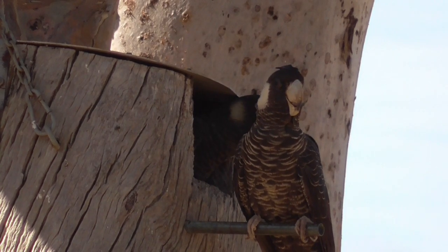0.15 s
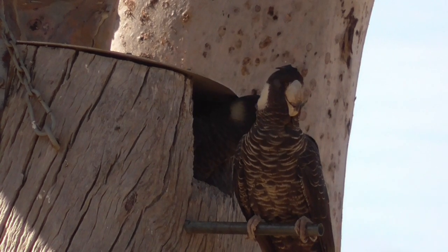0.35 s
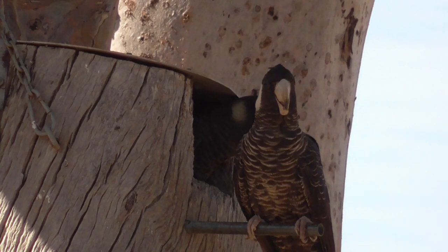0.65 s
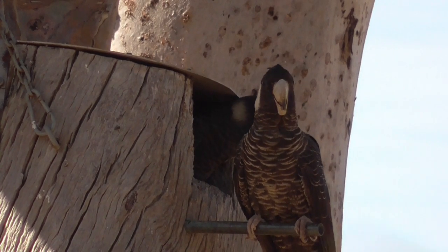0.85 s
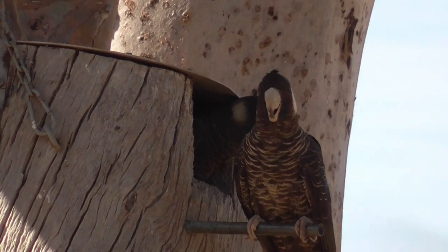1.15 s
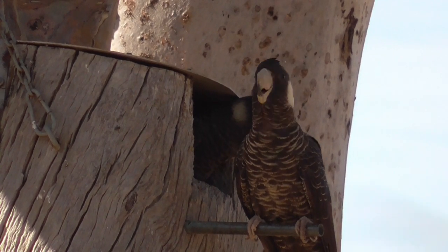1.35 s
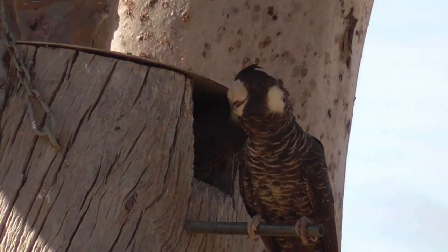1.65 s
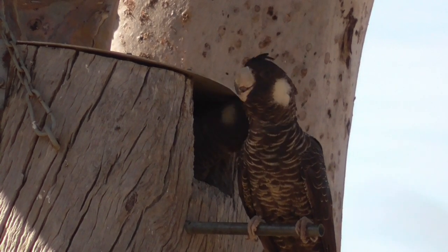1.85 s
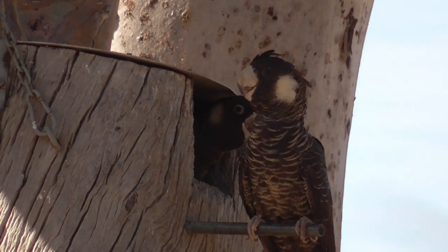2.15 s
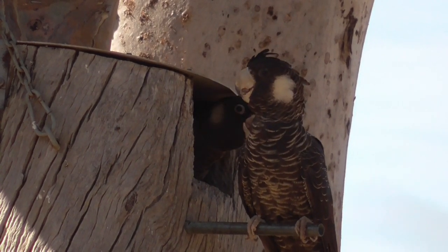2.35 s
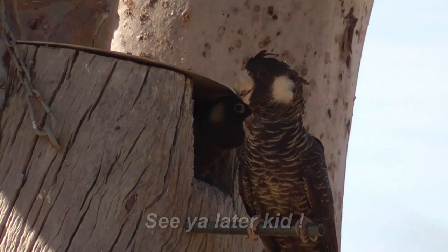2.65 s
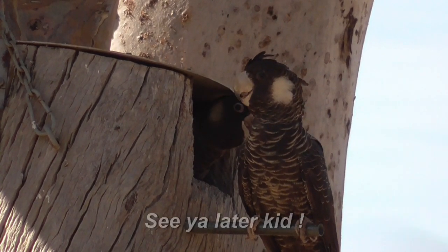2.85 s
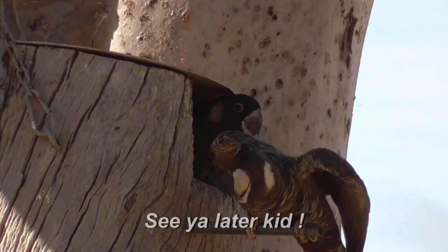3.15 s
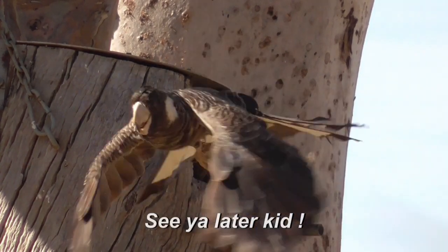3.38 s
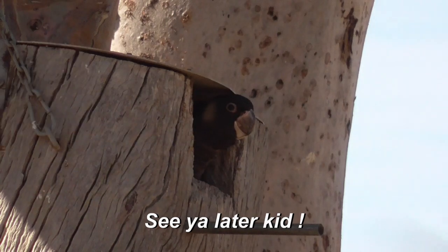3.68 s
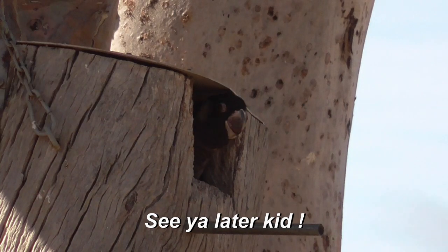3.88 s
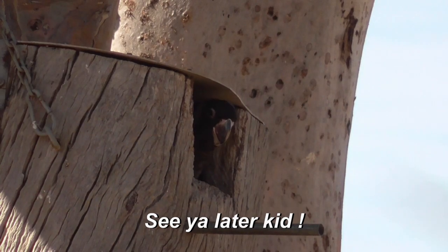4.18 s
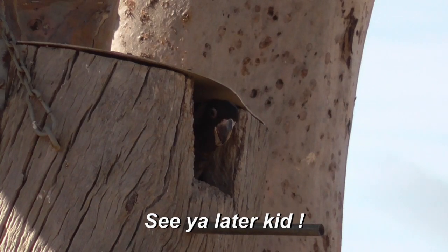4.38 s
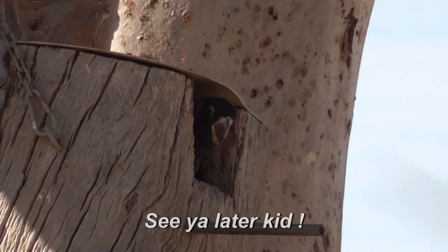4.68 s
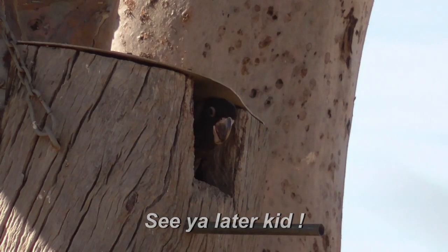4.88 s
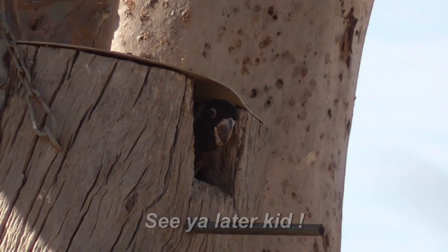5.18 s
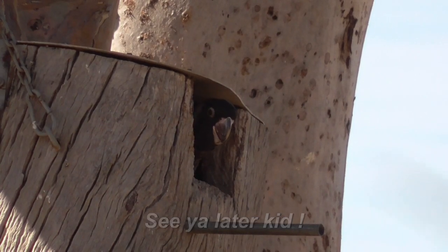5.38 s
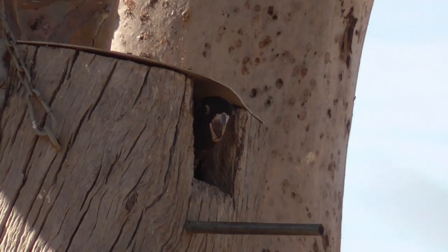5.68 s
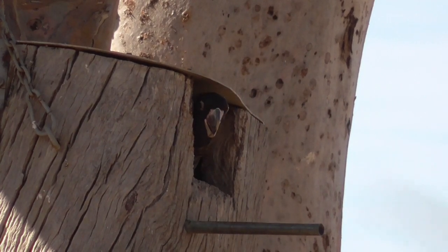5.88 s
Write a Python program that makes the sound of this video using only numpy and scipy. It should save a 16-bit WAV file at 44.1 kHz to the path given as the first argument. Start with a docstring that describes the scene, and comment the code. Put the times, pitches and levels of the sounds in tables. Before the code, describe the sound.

Quiet outdoor air with far hoarse parrot calls and a faint accelerating engine, until a nearby cockatoo bursts into piercing, yodelling whistles split by a croak.

```python
"""From the start a distant road vehicle gathers speed under open-air noise; far cockatoos chatter softly from 0.5 s.
Brief treble rustles fall at 1 s and 3 s. At 4.5 s a cockatoo close by yodels a whistle that breaks between registers,
croaks at 5.0 s and whistles again at 5.2 s, as the vehicle pulls again after a gear change; trees send back echoes.
Voices and engine are harmonic oscillators, the croak a pulsed resonance, breath, rustles and air coloured noise."""
import sys
import numpy as np
from scipy import signal
from scipy.fft import rfft, irfft, next_fast_len
from scipy.io import wavfile
from scipy.ndimage import uniform_filter1d

SR = 44100
rng = np.random.default_rng(int(sys.argv[2]) if len(sys.argv) > 2 else 0)


def to_wav(sig):
    """Store sig (one row per channel, or 1-D mono) as 16-bit WAV at the path in sys.argv[1].

    Samples outside -1..1 are clipped; the rate is SR.
    """
    pcm = np.clip(np.atleast_2d(sig), -1, 1) * 32767
    pcm = np.round(pcm).astype(np.int16)
    wavfile.write(sys.argv[1], SR, pcm.T)  # frames by channels


N = 265923


def from_db(db):
    """Gain of a level in dB."""
    return 10 ** (np.asarray(db) / 20)


def rms_one(x):
    """Scaled to rms 1."""
    return x / np.sqrt(np.mean(x ** 2) + 1e-20)


def at_hz(points, hz):
    """A spectrum table read on a log-frequency axis."""
    table_hz, values = np.array(points).T
    return np.interp(np.log(hz), np.log(table_hz), values)


def in_time(rows):
    """Each column as a curve over all samples."""
    time_s, *columns = np.transpose(rows)
    return [np.interp(np.arange(N) / SR, time_s, column) for column in columns]


def window(start_s, length_s, edge_s):
    """Span with soft edges centred on its ends; spans shorter than edge_s peak below 1."""
    t = np.arange(N) / SR - start_s
    return np.clip(np.minimum(t, length_s - t) / edge_s + .5, 0, 1)


def sounding(tables, edge_s):
    """1 while any note sounds."""
    gates = [window(note[0][0], note[-1][0] - note[0][0], edge_s) for note in tables]
    return np.minimum(sum(gates), 1)


def noise_band(low_hz, high_hz, order, shape):
    """White noise through a band-pass."""
    sos = signal.butter(order, [low_hz, high_hz], "band", fs=SR, output="sos")
    return signal.sosfilt(sos, rng.standard_normal(shape))


def wobble(rate_hz):
    """Low-passed noise of rms 1."""
    sos = signal.butter(4, min(rate_hz, 9000), fs=SR, output="sos")
    return rms_one(signal.sosfilt(sos, rng.standard_normal(N)))


# stereo noise likeness: hz, left_right_likeness
NOISE_LIKENESS = [(60, 0.89), (180, 0.81), (550, 0.66), (1650, 0.3), (4970, 0.29), (15000, 0.09)]
# stereo noise tilt: hz, left_minus_right_db
NOISE_BALANCE = [(60, 0.5), (180, -2), (550, -2), (1650, 0.0), (4970, -0.5), (15000, -2.5)]


def banded_noise(spectrum, patchy_db):
    """Coloured stereo noise, less alike left and right in the treble, slowly swelling; rms 1."""
    size = next_fast_len(N)
    hz = np.maximum(np.fft.rfftfreq(size, 1 / SR), 1)
    alike = np.clip(at_hz(NOISE_LIKENESS, hz), 0, 1)
    mid, side = rfft(rng.standard_normal((2, size))) * from_db(at_hz(spectrum, hz))
    both = np.sqrt(1 + alike) * mid + np.sqrt(1 - alike) * side * [[1], [-1]]
    both = both * from_db(np.outer([.5, -.5], at_hz(NOISE_BALANCE, hz)))
    swelling = from_db(patchy_db * wobble(2.18))
    return rms_one(irfft(both, size)[:, :N] * swelling)


def stack(hz, levels_db, rough, jitter):
    """Harmonics of a slightly unsteady pitch."""
    phase = 2 * np.pi * np.cumsum(hz * (1 + jitter * wobble(119))) / SR
    gains = uniform_filter1d(from_db(levels_db), size=150)  # strength cannot jump within 3 ms
    tone = sum(gain * np.sin(k * phase) for k, gain in enumerate(gains, 1))
    return np.sqrt(2) * tone * (1 + rough * wobble(150)), phase, hz


def partials(tables, colours, rough, jitter, effort):
    """One harmonic stack through all notes; colour tables and brightness set each partial's level."""
    hz, db, *bright = in_time(np.concatenate(tables))
    tilt_db = sum(bright) + effort * (db - db.max())  # a louder call is richer on top
    levels_db = [db + at_hz(colour, hz * (k + 1)) + k * tilt_db for k, colour in enumerate(colours)]
    return stack(hz, levels_db, rough, jitter)


def held(tables):
    """A note is held until the next when the voice jumps straight from one to the other."""
    out = [list(note) for note in tables]
    for note, after in zip(out, out[1:]):
        if after[0][0] - note[-1][0] < .009:
            note.append((after[0][0] - 1 / SR, *note[-1][1:]))
    return out


# near whistles, one list per register note: time_s, pitch_hz, level_db, brightness_db_per_partial
NEAR_NOTES = [
    [(4.517, 1264, -46, 1), (4.533, 1630, -41, 3), (4.542, 1757, -47, 4)],
    [(4.545, 3257, -50, 1), (4.553, 3329, -37.5, 7.5), (4.565, 3300, -64, 1.5), (4.572, 3332, -36, -3)],
    [(4.597, 3409, -36.5, -24), (4.615, 3613, -28.5, 3), (4.657, 3667, -31, 0.5), (4.668, 3620, -35, -6),
     (4.697, 3755, -26, -4.5), (4.729, 3912, -21.5, -3.5), (4.759, 3820, -23, 3.5), (4.773, 3560, -29, 4)],
    [(4.779, 3047, -29.5, 4), (4.803, 2863, -32, 6.5), (4.829, 2767, -31.5, 1), (4.86, 2690, -29.5, -4),
     (4.883, 2749, -32.5, -3), (4.925, 2610, -37.5, -5.5), (4.935, 2620, -40.5, 0)],
    [(4.94, 2119, -29.5, 0.5), (4.955, 2036, -30.5, 0.5), (4.967, 1859, -39, 3.5), (4.977, 1640, -47, 4)],
    [(5.211, 1600, -36.5, 4.5), (5.218, 1765, -37, 4), (5.225, 1850, -31.5, 4.5), (5.237, 2013, -25.5, 0)],
    [(5.242, 2700, -46, 17.5), (5.248, 2817, -22.5, -4.5), (5.261, 3006, -30, 2.5)],
    [(5.266, 3658, -27.5, 3), (5.274, 3726, -21.5, 4.5), (5.284, 3803, -32, -15), (5.292, 3872, -53, 15)],
    [(5.313, 3790, -57, 12), (5.321, 3763, -22.5, -1.5), (5.333, 3766, -21, -1.5), (5.344, 3626, -29.5, 2)],
    [(5.349, 2899, -28, 0), (5.365, 2881, -27.5, 0.5), (5.381, 2857, -31.5, -4), (5.4, 2740, -34, 3.5),
     (5.427, 2456, -37, -12), (5.444, 2477, -45, -3)],
    [(5.449, 1838, -44.5, 2.5), (5.485, 1957, -37.5, 0.5), (5.501, 2035, -29, 1), (5.54, 1920, -32, 1),
     (5.571, 1845, -40, 5), (5.613, 1806, -34, 1), (5.638, 1669, -42.5, 4.5)],
]
# 1st partial carries the level itself: hz, relative_db
FLAT = [(1, 0)]
# near bird's 2nd partial before brightness: hz, db_re_1st
SECOND_PARTIAL = [(2600, -13), (3300, -9), (3800, -2), (4200, -2), (5600, -5.5), (6600, -29), (7600, -25)]
# its 3rd partial: hz, db_re_1st
THIRD_PARTIAL = [(4500, -31), (5200, -19.5), (6000, -23), (8000, -35), (8700, -27), (10700, -44),
                 (11700, -31)]
# its 4th to 6th partials: hz, db_re_1st
UPPER_PARTIALS = [(5500, -21), (6400, -23), (7300, -47), (8300, -43), (9300, -30), (10300, -38.5),
                  (11500, -41.5), (13000, -48), (15000, -77)]
# hiss in the windpipe, spectral shape: hz, relative_db_per_hz
AIRFLOW = [(1500, -39), (3000, 3), (6000, -4), (7000, -25), (10500, -9), (12000, -11.5), (13500, -47)]
# voice breaks, levels before the soft window: start_s, length_s, side_tones_db_re_whistle, rasp_db_re_whistle
BREAKS = [(4.537, 0.032, -4, -25.5), (4.62, 0.0077, -13.5, -16), (4.769, 0.01, -20.5, -31),
          (4.929, 0.011, -32, -6), (5.206, 0.013, -20, -2.5), (5.238, 0.0068, -17, -13),
          (5.268, 0.0033, -10.5, -29), (5.343, 0.0053, -10, -22), (5.442, 0.012, -30, -22),
          (5.628, 0.018, -45, -13)]
BEAT_HZ = 780  # nominal syrinx beat; the whistle locks onto a multiple of it
AIRFLOW_DB = -35  # re whistle


def near_whistles():
    """Harmonic whistle with windpipe hiss; at each break the syrinx beat adds side tones and airflow rasps."""
    notes = held(NEAR_NOTES)
    colours = [FLAT, SECOND_PARTIAL, THIRD_PARTIAL] + 3 * [UPPER_PARTIALS]
    tone, phase, hz = partials(notes, colours, rough=0.035, jitter=0.0022, effort=0.056)
    multiple = np.maximum(np.round(hz / BEAT_HZ), 1)
    beat = np.cumsum(np.gradient(phase) / multiple)
    pulses = np.cos(beat) + 0.13 * np.cos(2 * beat) + 0.048 * np.cos(3 * beat)
    rasp = wobble(1200)
    out = tone * sounding(notes, edge_s=.004)
    strength = uniform_filter1d(np.abs(out), size=200)
    out = out + strength * from_db(AIRFLOW_DB) * banded_noise(AIRFLOW, patchy_db=.5)[0]
    for start_s, length_s, side_db, rasp_db in BREAKS:
        modulation = 2 * from_db(side_db) * pulses + from_db(rasp_db) * rasp
        out = out + window(start_s, length_s, 0.013) * tone * modulation
    return out


# croak after the first whistle: time_s, throat_hz, level_db
CROAK = [(5.0, 1333, -70), (5.016, 1385, -40.5), (5.054, 1273, -52), (5.09, 1220, -42), (5.17, 1187, -55.5)]


def croak(pulses_per_s, width_hz, air):
    """Rapid uneven pulses ring a low throat resonance and its overtone and let out puffs of air."""
    throat_hz, db = in_time(CROAK)
    cycles = np.cumsum(pulses_per_s * from_db(3 * wobble(56.3))) / SR
    decay = np.exp(-np.pi * width_hz / pulses_per_s * (cycles % 1))
    puffs = decay * from_db(1.8 * wobble(35))
    puffs = uniform_filter1d(puffs, size=80)  # the folds take 2 ms to open
    phase = 2 * np.pi * np.cumsum(throat_hz * (1 + .08 * wobble(150))) / SR
    hiss = noise_band(1100, 5500, 4, N)
    ring = rms_one(puffs * (np.sin(phase) + 0.52 * np.sin(1.3 * phase) + air * hiss))
    return ring * from_db(db) * sounding([CROAK], edge_s=0.0089)


# near bird's stereo tilt: hz, left_minus_right_db
NEAR_BALANCE = [(1200, -0.5), (2000, -1.5), (2800, 1), (3800, -1), (5500, -6), (7500, -7), (11000, -5.5)]
# the bird moves, added to that tilt: time_s, left_minus_right_db
NEAR_PAN = [(4.5, 3), (4.78, -1), (4.95, 1.5), (5.2, 0.5), (5.35, -0.5), (5.64, 0.5)]


def place_near(near):
    """Mono to stereo by a left-right tilt per frequency, turned as the bird moves."""
    hz = np.maximum(np.fft.rfftfreq(N, 1 / SR), 1)
    both = irfft(rfft(near) * from_db(np.outer([.5, -.5], at_hz(NEAR_BALANCE, hz))), N)
    return both * from_db(np.outer([.5, -.5], in_time(NEAR_PAN)[0]))


# far clear notes, one list per note: time_s, pitch_hz, level_db
FAR_CLEAR = [
    [(1.655, 3866, -68), (1.695, 3910, -67)],
    [(1.708, 3390, -67), (1.722, 3620, -66), (1.733, 4140, -60), (1.742, 4250, -69)],
    [(1.8, 1591, -60), (1.833, 1566, -57.5), (1.848, 1505, -51), (1.905, 1328, -49), (1.94, 1285, -66),
     (1.965, 1352, -76)],
    [(5.765, 663, -57), (5.785, 667.4, -51.5), (5.89, 658, -54.5), (5.92, 660, -61)],
]
# overtones of the clear notes: hz, db_re_1st
FAR_CLEAR_UPPER = [(1300, -10), (2000, -10), (2750, -31), (3150, 1.5), (4100, -42), (4650, -4), (5200, -52)]
# far hoarse warbles, one list per call: time_s, pitch_hz, level_db (before voice colour and flutter)
FAR_HOARSE = [
    [(0.55, 647, -72), (0.57, 707, -64.5), (0.6, 765, -67), (0.612, 803, -70), (0.625, 738, -59),
     (0.638, 810, -66), (0.648, 716, -61), (0.66, 787, -66), (0.67, 708, -56), (0.685, 798, -67),
     (0.71, 801, -60), (0.76, 791, -79), (0.8, 785, -62), (0.87, 790, -84)],
    [(1.175, 749, -67), (1.215, 768, -70), (1.24, 907, -62), (1.265, 935, -61), (1.29, 690, -61),
     (1.32, 790.5, -61), (1.34, 697, -62), (1.385, 897, -62), (1.412, 645, -60), (1.446, 678.5, -65.5),
     (1.49, 691, -71)],
    [(1.558, 789, -69), (1.568, 719, -58.5), (1.592, 663, -67.5), (1.61, 690, -70)],
    [(2.5, 676, -76), (2.53, 674, -64.5), (2.57, 685, -65.5), (2.6, 690, -78)],
    [(3.26, 795, -68), (3.295, 770, -56), (3.37, 763, -76)],
    [(4.045, 725, -75), (4.088, 745, -60), (4.112, 667, -70)],
    [(4.113, 690, -60), (4.14, 707, -63.5), (4.165, 802.6, -62), (4.182, 894, -60), (4.22, 880, -54),
     (4.24, 715, -58), (4.252, 728, -44), (4.265, 798, -63), (4.285, 788, -55), (4.306, 692, -68),
     (4.338, 925, -54), (4.36, 926, -61), (4.38, 658, -62.5), (4.402, 729, -61), (4.43, 647, -68)],
]
# manner of each warble: upper_throat_hz, upper_throat_db, roughness_0_to_1
FAR_MANNER = [(3210, -2.5, 0.31), (3006, -24, 0.28), (3690, 4.5, .5), (3280, -21, .2), (3375, -3.5, .15),
              (2900, -3, 0.21), (3000, -22, .2)]
# voice colour of the warbles: hz, relative_db
FAR_VOICE = [(750, -3.5), (1400, -3), (1800, -7), (2050, -0.5), (2300, -1.5), (2700, -15), (3300, -33),
             (4300, -28)]
FLUTTER_DB, WAVER = 8.5, .03  # rms swing of each partial and of pitch (share), times roughness
UPPER_THROAT_DB_PER_KHZ = 16  # fall on either side of that resonance


def far_flock():
    """Clear notes and hoarse harmonic warbles; distance has taken their upper partials."""
    colours = [FLAT] + 2 * [FAR_CLEAR_UPPER]
    clear = partials(FAR_CLEAR, colours, rough=0.29, jitter=0.00222, effort=0)[0]
    rows = [(*row, *manner) for call, manner in zip(FAR_HOARSE, FAR_MANNER) for row in call]
    hz, db, throat_hz, throat_db, hoarse = in_time(rows)
    hz = hz * (1 + WAVER * hoarse * wobble(34.95))
    levels_db = []
    for k in range(1, 7):
        throat = throat_db - UPPER_THROAT_DB_PER_KHZ * np.abs(k * hz - throat_hz) / 1000
        colour_db = np.maximum(at_hz(FAR_VOICE, k * hz), throat)
        levels_db.append(db + FLUTTER_DB * hoarse * wobble(45) + colour_db)
    warbles = stack(hz, levels_db, rough=0.14, jitter=0.0039)[0]
    return clear * sounding(FAR_CLEAR, edge_s=0.0083) + warbles * sounding(FAR_HOARSE, edge_s=0.003)


# raspy body of the far squawks: start_s, swell_s, peak_db, fade_db_per_s
FAR_RASP = [(0.6, .13, -58.5, 67), (2.5, 0.14, -62.5, 58), (3.27, .05, -63.5, 20), (4.08, .17, -69, 49)]
# its throat resonances: hz, width_hz, relative_db
FAR_THROAT = [(1420, 230, 0), (2250, 290, 0), (3080, 730, -6.5), (3970, 540, -7)]
RASP_SWELL_DB = 5  # rise from start to peak


def far_rasp(throbs_per_s, depth_db):
    """Turbulent air in four throat resonances, throbbing unevenly."""
    air, out = rng.standard_normal(N), 0
    for hz, width_hz, db in FAR_THROAT:
        band = signal.butter(2, [hz - width_hz / 2, hz + width_hz / 2], "band", fs=SR, output="sos")
        out = out + from_db(db) * rms_one(signal.sosfilt(band, air))
    level = 0
    for start_s, swell_s, peak_db, fade_db_per_s in FAR_RASP:
        t = np.arange(N) / SR - start_s
        below_peak_db = np.maximum(RASP_SWELL_DB * (1 - t / swell_s), fade_db_per_s * (t - swell_s))
        level = level + (t > 0) * from_db(peak_db - below_peak_db.clip(0, 90))
    return level * rms_one(out * from_db(depth_db * wobble(throbs_per_s)))


# brief treble rustles: start_s, time_to_fall_9_db_s, start_level_db
RUSTLES = [(0.983, 0.068, -58), (1.037, 0.013, -80), (2.934, .03, -83), (3.123, 0.019, -81)]
# their spectral shape: hz, relative_db_per_hz
RUSTLE_COLOUR = [(1470, -44), (2500, -6), (3800, 1), (4910, -9), (5490, -8), (6240, -7), (15000, -47)]


def rustling():
    """Treble noise in short bursts, each fading away."""
    seconds, level = np.arange(N) / SR, 0
    for start_s, fall_s, db in RUSTLES:
        fading = from_db(db - 9 * np.clip(seconds - start_s, 0, 1) / fall_s)
        level = level + fading * window(start_s, 2 * fall_s, .01)
    return level * banded_noise(RUSTLE_COLOUR, patchy_db=.5)


# far engine, two pulls with a gear change between: time_s, firing_hz, level_db
ENGINE = [
    [(0.0, 51.6, -64), (0.51, 60.5, -66.5), (1.12, 67.6, -64.5), (1.58, 69.8, -63.5), (3.01, 78.8, -61),
     (3.56, 84.4, -61.5), (3.8, 89, -70)],
    [(4.8, 52, -86), (5.3, 54.2, -75), (5.45, 58.5, -66), (5.93, 66.2, -65), (6.03, 66, -53)],
]
# its harmonics: multiple_of_firing, relative_db
ENGINE_ORDERS = [(1, 0), (2, -14.5), (3, -8.5)]


def engine():
    """Low firing orders, swelling as the air carries them unevenly."""
    hz, db = in_time(np.concatenate(ENGINE))
    phase = 2 * np.pi * np.cumsum(hz) / SR
    orders = sum(from_db(order_db + 2.4 * wobble(3.2)) * np.sin(k * phase) for k, order_db in ENGINE_ORDERS)
    return np.sqrt(2) * from_db(db) * orders * sounding(ENGINE, edge_s=0.29)


# open-air noise, spectral shape: hz, relative_db_per_hz
AIR = [(15, -49), (25, -17), (61, -9), (101, -3), (297, -1), (331, -2.5), (537, -3.5), (971, -6.5),
       (1660, -21), (2240, -22), (2560, -29), (3530, -24), (6060, -34), (8360, -29), (15500, -32.5)]
AIR_DB = -51.5


def open_air():
    """Steady coloured noise for road rumble, leaves and hiss."""
    return from_db(AIR_DB) * banded_noise(AIR, patchy_db=0.33)


# trunk echoes, level before echo_db is added: delay_s, level_db, left_minus_right_db
TRUNKS = [(0.043, -12.5, -3), (0.014, -15.5, 11), (0.11, -33.5, -23), (.2, -59, 0.5)]
# scattering decay: hz, t60_s
WOOD_T60 = [(700, 1.5), (2000, 0.76), (4000, 0.59), (8000, 0.73)]


def woodland(x, scatter_db, echo_db):
    """A few trunk echoes, plus scattering that decays at its own rate per band, partly other in each channel."""
    t, size = np.arange(SR) / SR, next_fast_len(N + SR)
    edges_hz = 300 * 2 ** np.arange(0, 6., .5)
    reply = np.zeros((2, SR))
    for low_hz, high_hz in zip(edges_hz, edges_hz[1:]):
        band = noise_band(low_hz, high_hz, 2, (3, SR))
        band = band[0] + 0.84 * band[1:]  # shared part + each channel's own
        reply += band * from_db(-60 * t / at_hz(WOOD_T60, np.sqrt(low_hz * high_hz)))
    reply *= np.clip(t / 0.0075, 0, 1)
    reply *= from_db(scatter_db) / np.sqrt(np.sum(reply ** 2) / 2)
    bark = np.hanning(9) / 4  # rough bark returns little treble
    for delay_s, db, pan_db in TRUNKS:
        at = round(delay_s * SR)
        gains = from_db(db + echo_db + np.array([.5, -.5]) * pan_db)
        reply[:, at:at + len(bark)] += np.outer(gains, bark)
    return irfft(rfft(x, size) * rfft(reply, size), size)[:, :N]


def scene():
    """Near bird, far flock, their echoes, rustles, engine and open air."""
    near = near_whistles() + croak(pulses_per_s=200, width_hz=200, air=.3)
    far = far_flock() + far_rasp(throbs_per_s=49, depth_db=1.0)
    out = place_near(near) + woodland(near, scatter_db=-11, echo_db=1.5)
    out = out + far * from_db([[-1.5], [.3]]) + woodland(far, scatter_db=-7.5, echo_db=1.5)
    return out + rustling() + engine() * from_db([[-.8], [.8]]) + open_air()


CUTOFF_HZ = 15600


def record(dry):
    """Deep rumble is filtered out, the top is cut steeply."""
    dry = signal.sosfilt(signal.butter(3, 40, "high", fs=SR, output="sos"), dry)
    return signal.sosfilt(signal.ellip(12, .5, 70, CUTOFF_HZ, fs=SR, output="sos"), dry)


dry = scene()
out = record(dry)
to_wav(out)
```